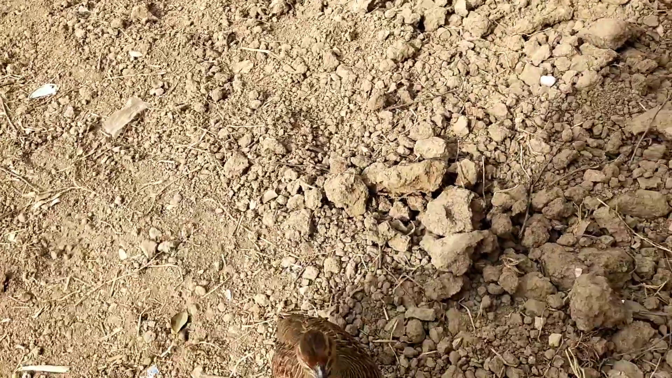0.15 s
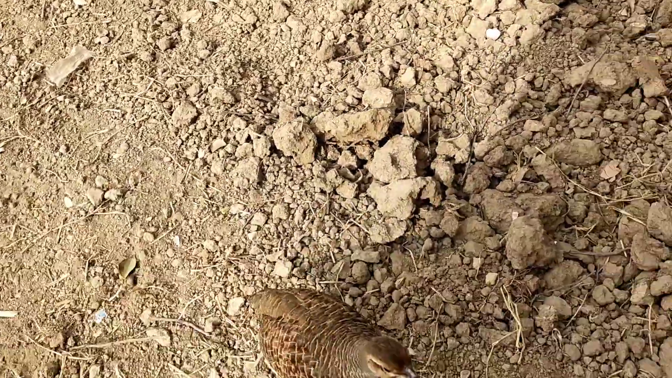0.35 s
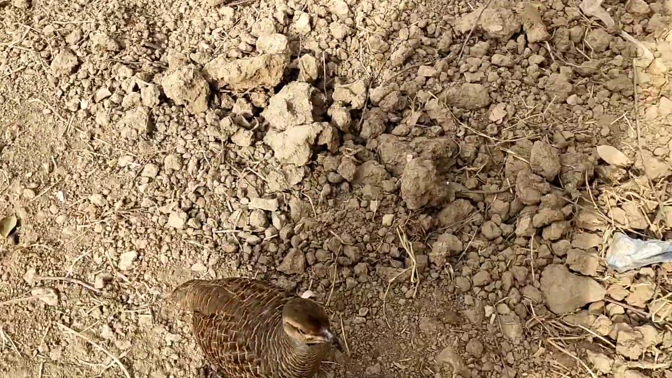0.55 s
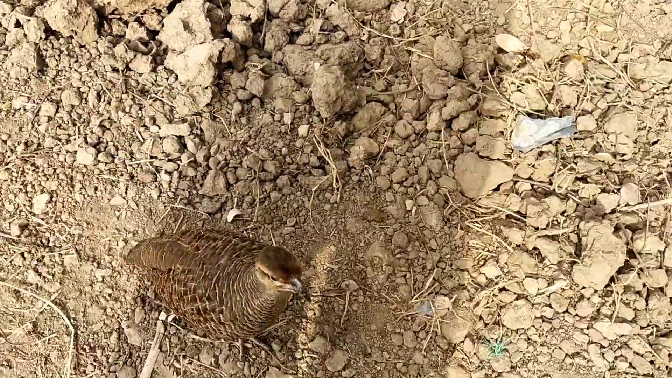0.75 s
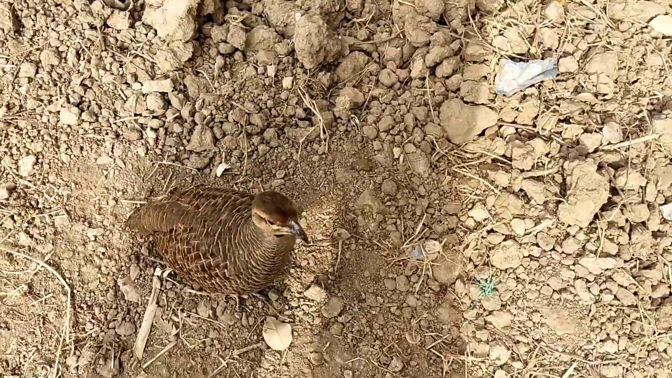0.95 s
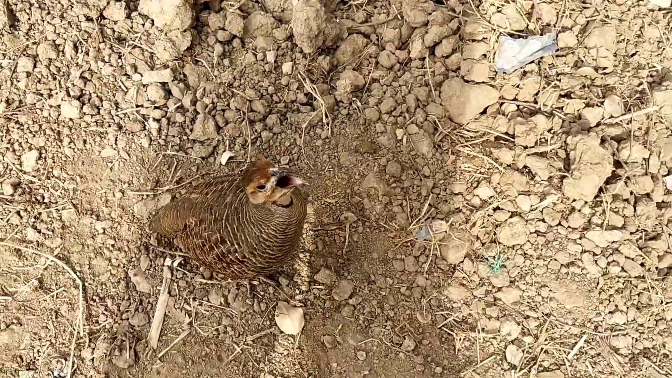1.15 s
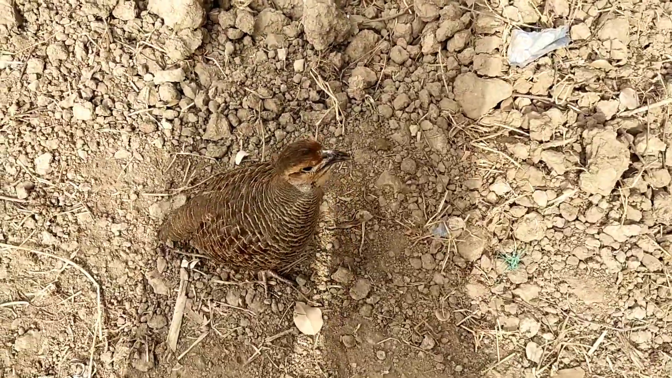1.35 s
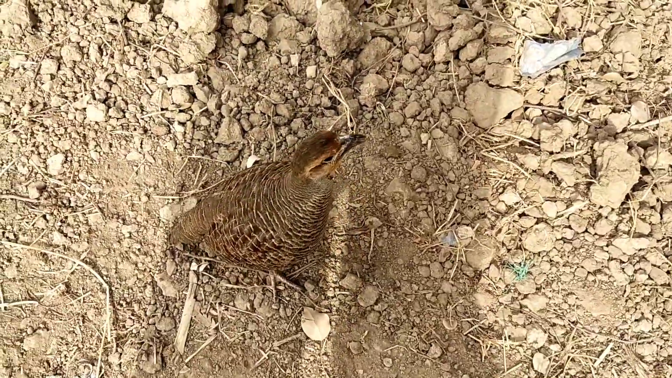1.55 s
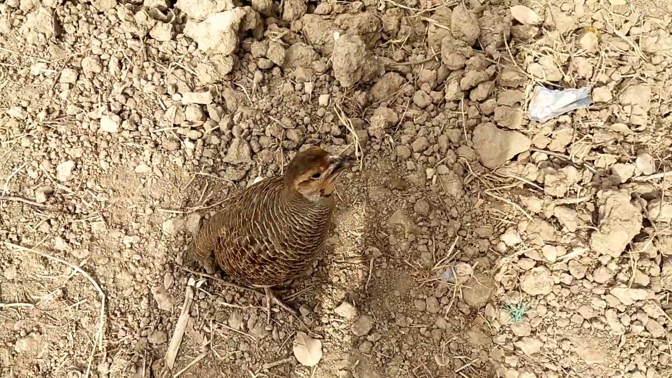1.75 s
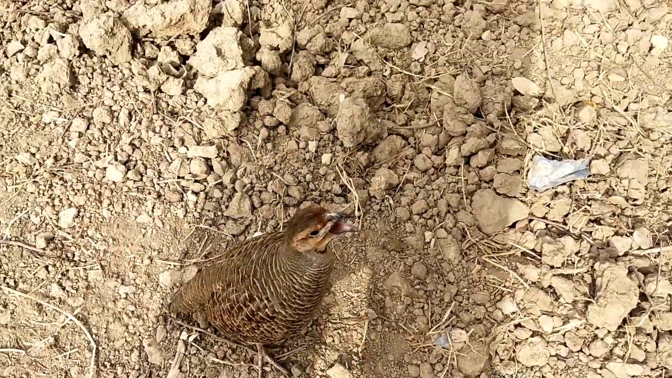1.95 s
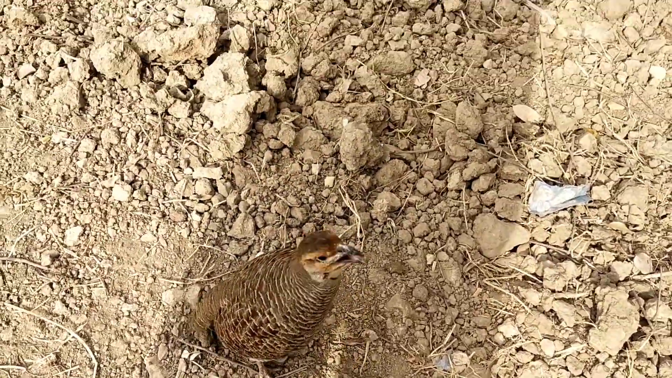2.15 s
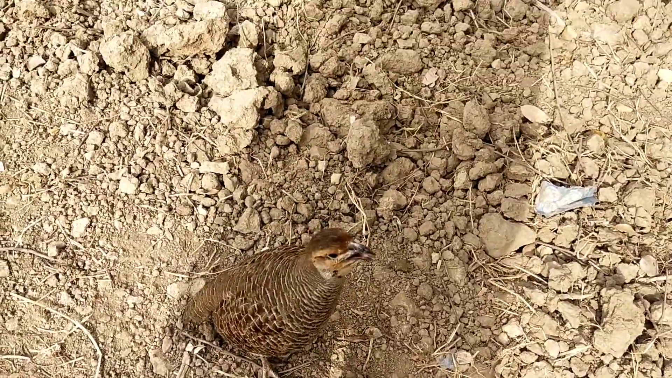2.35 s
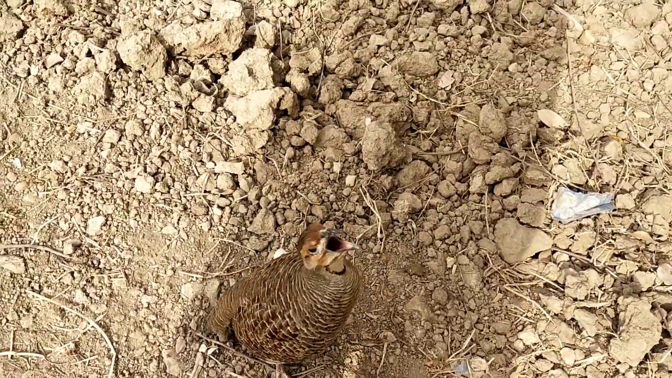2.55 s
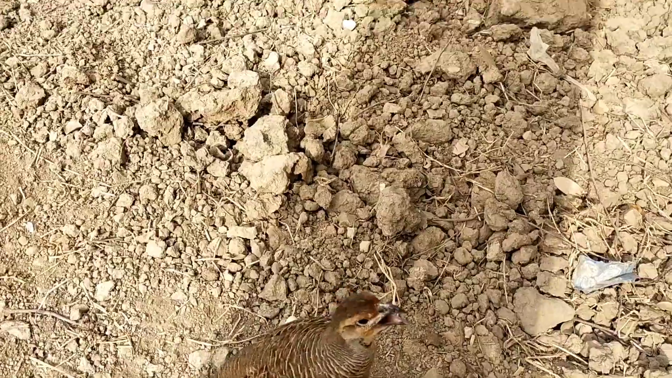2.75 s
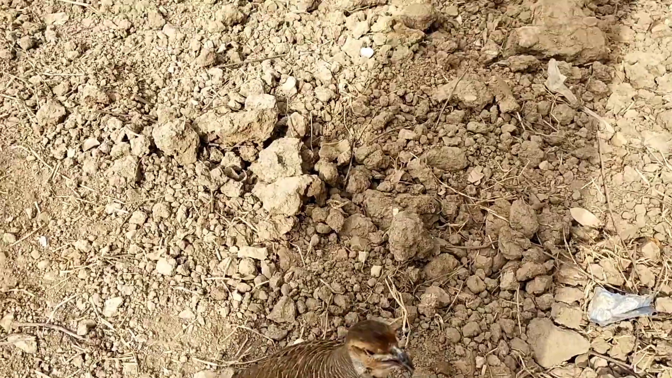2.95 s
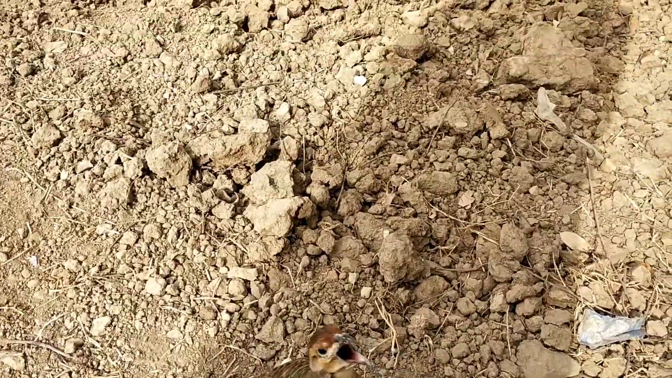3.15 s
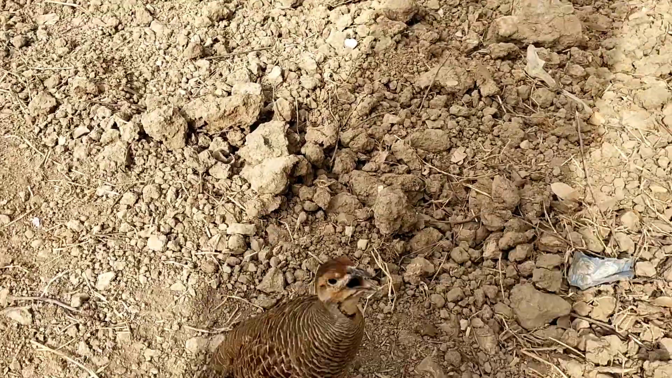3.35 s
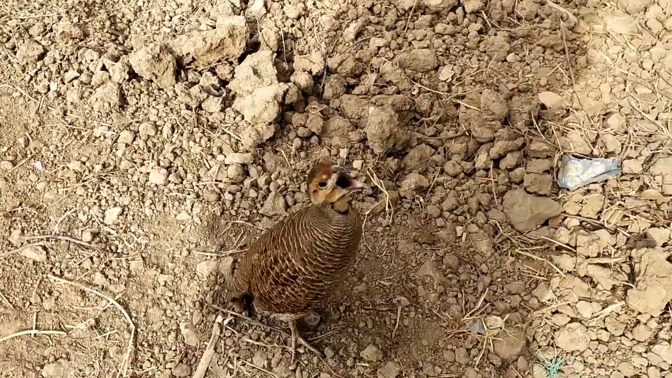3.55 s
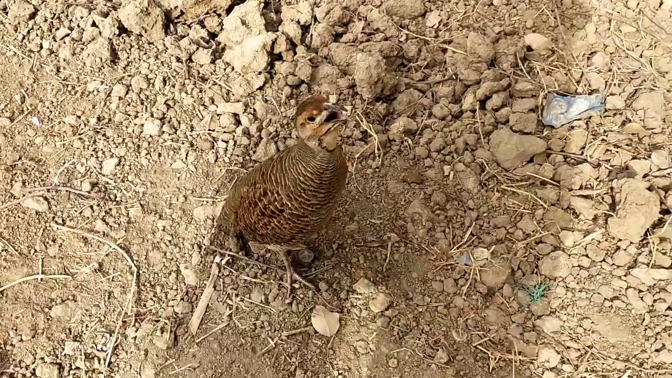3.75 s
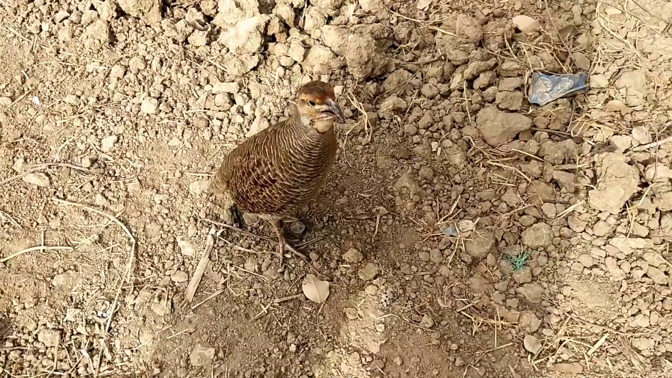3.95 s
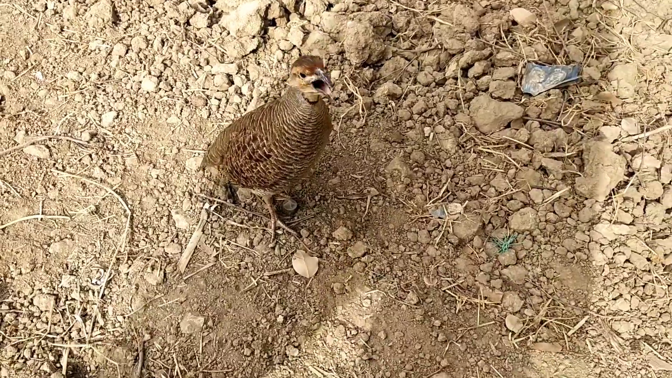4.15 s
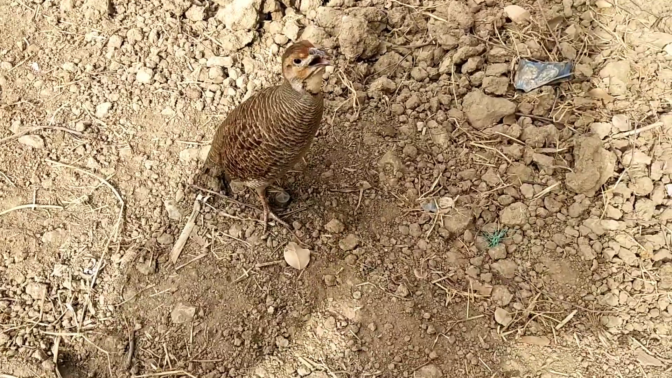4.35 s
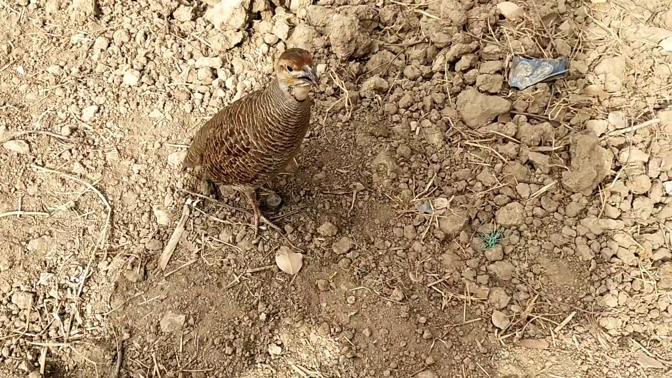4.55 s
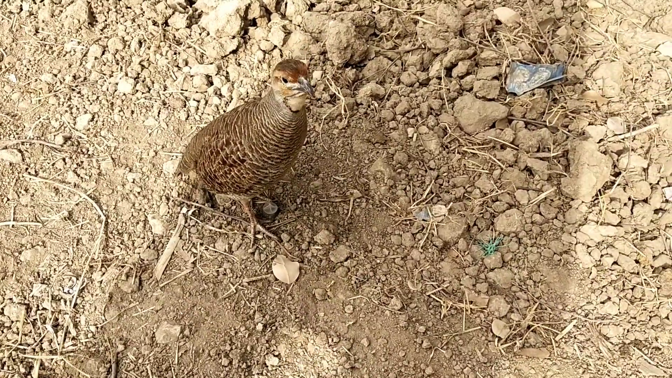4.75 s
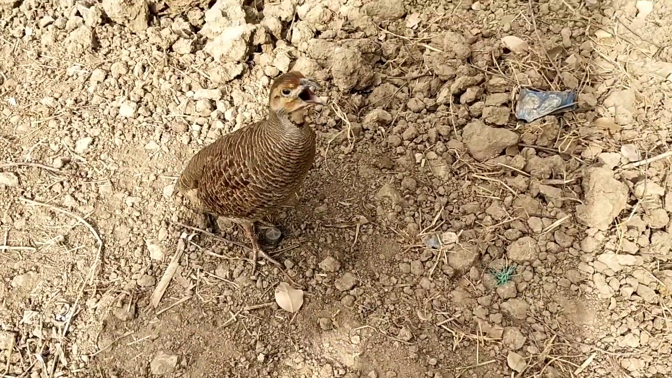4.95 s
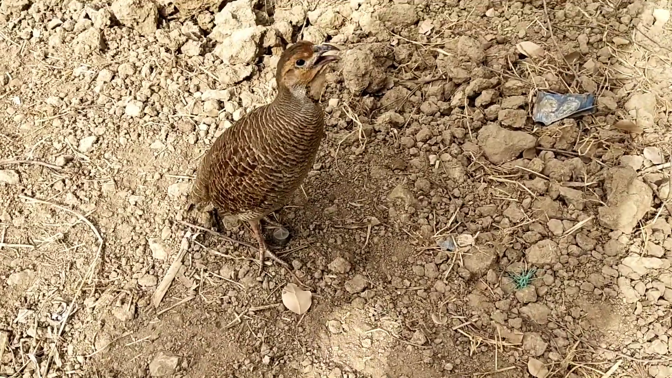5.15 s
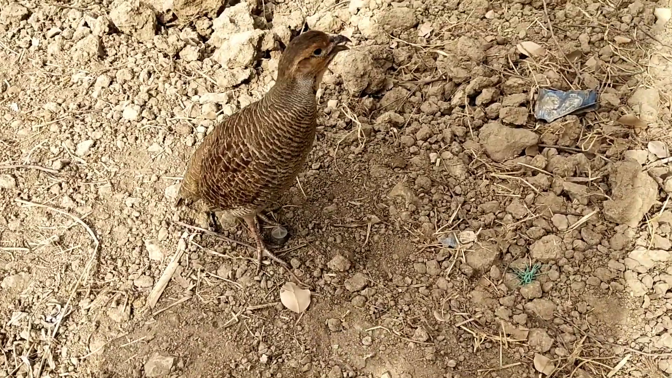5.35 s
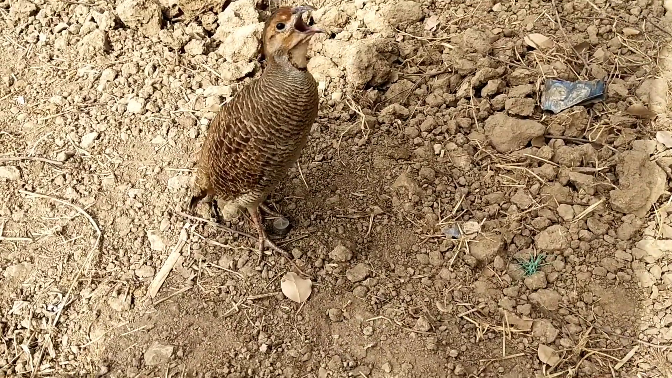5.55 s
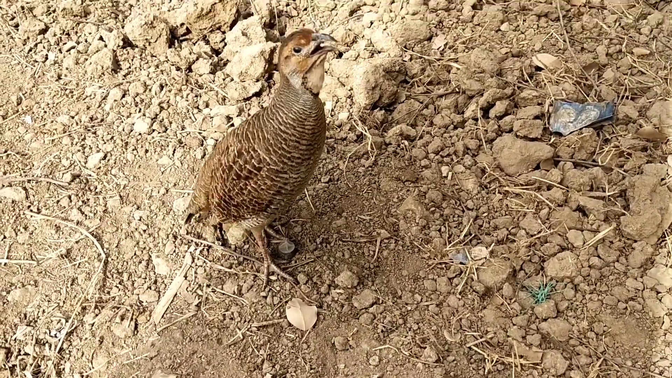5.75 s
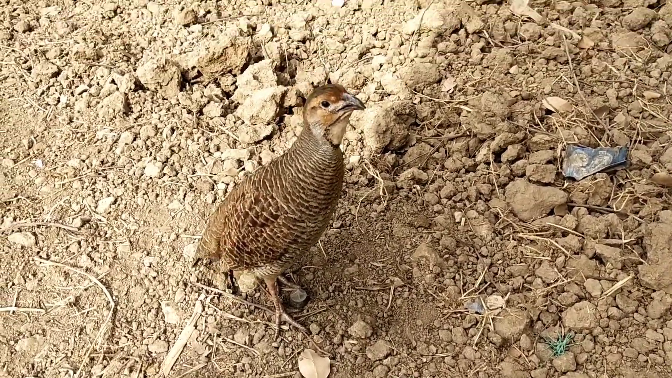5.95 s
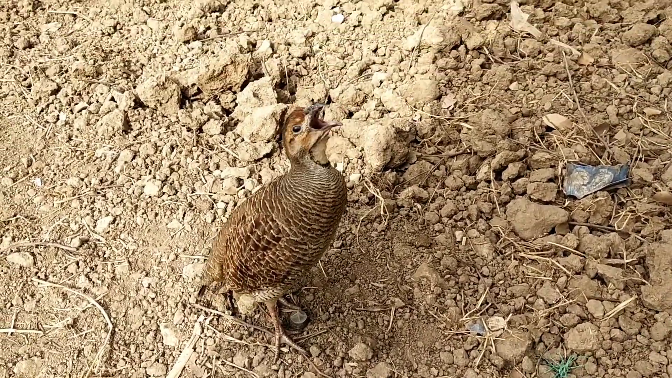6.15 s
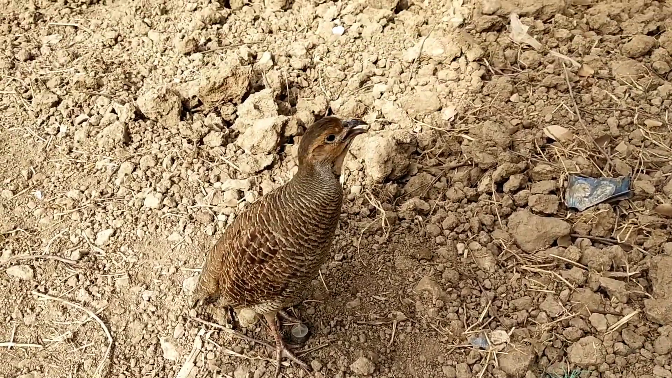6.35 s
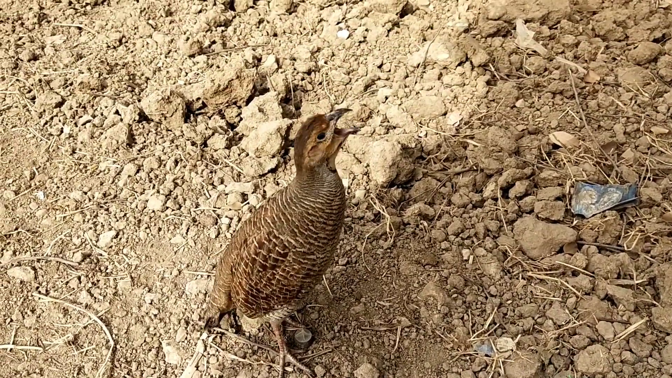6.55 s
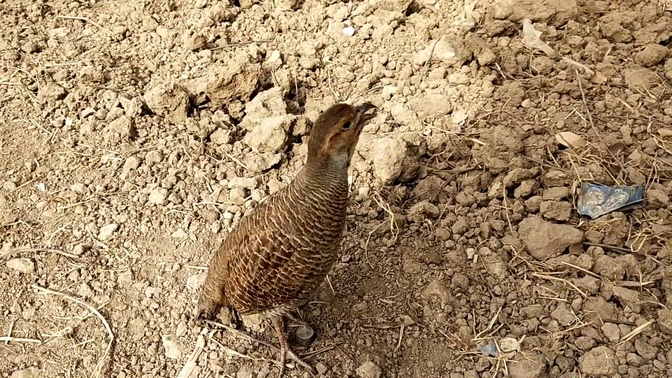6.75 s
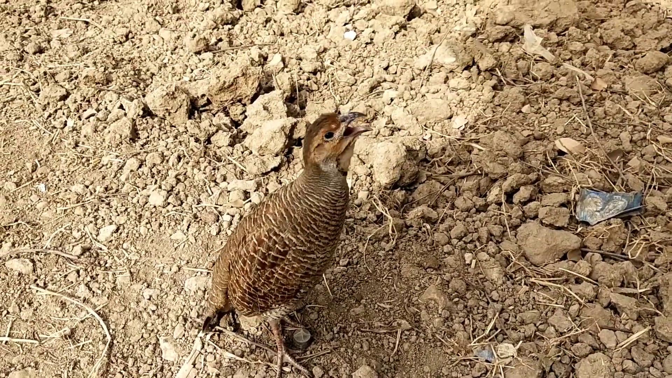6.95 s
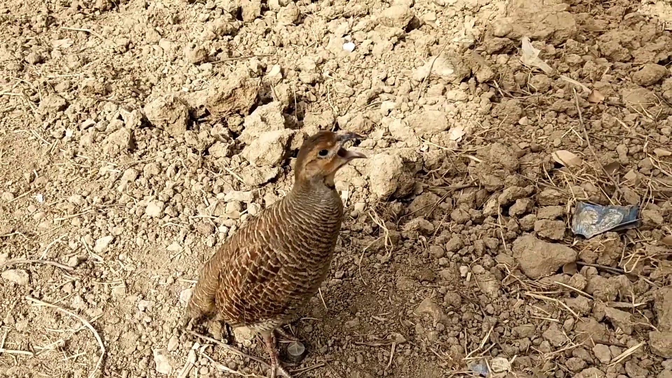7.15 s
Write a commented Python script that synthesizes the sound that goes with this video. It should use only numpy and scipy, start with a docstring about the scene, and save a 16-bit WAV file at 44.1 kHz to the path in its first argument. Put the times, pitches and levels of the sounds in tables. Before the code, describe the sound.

For the first second there is little but low outdoor rumble, a soft handling hiss, very faint far tones and light bumps near 0.2 seconds. A short quiet rasp from a second bird comes at about 0.95, and at 1.1 a francolin right by the camera starts shouting. Its fast, piercing phrases have three parts, a quick arch, a flat note near two kilohertz and a fall, with croaky edges. Between them come lower, hoarse barks, often two or three in a row until about 6, fewer afterwards; some end in a tiny yelp. A dull bump falls near 2.7. The second bird rasps throughout, more noticeably from 3.3 to 6.7, and gives thin falling whistles at 6.3 and 7.0. From 6.2 the phrases come closer together, still loud up to the end around 7.3. Short scattered echoes answer from distant walls; loud notes are compressed.

```python
"""A francolin calls loudly at the feet of a hand-held camera on open ground: a whistle with overtones sings
three-part phrases and lower barked notes, entered and left through croaks, slap pulses that ring a throat.
A second bird answers with rasps, pulse trains through throat and beak, and thin falling whistles.
Far walls echo as bursts of scattered noise; rumble, hiss, far tones and bumps lie beneath.
The swaying camera shifts the lag between its two ports, and its limiter holds the loud notes down."""
import sys
import numpy as np
from scipy import signal
from scipy.fft import rfft, irfft, next_fast_len
from scipy.io import wavfile
from scipy.ndimage import uniform_filter1d, minimum_filter1d, map_coordinates

SR = 44100
rng = np.random.default_rng(int(sys.argv[2]) if len(sys.argv) > 2 else 0)


def wav_record(signal):
    """Record a signal, one row per channel, as 16-bit PCM in the file named by sys.argv[1]."""
    frames = np.transpose(np.atleast_2d(signal))
    bounded = np.clip(frames, -1, 1)
    # unit amplitude maps onto the largest positive 16-bit level
    quanta = np.round(bounded * 32767).astype(np.int16)
    wavfile.write(sys.argv[1], SR, quanta)


N = 321930

# The yelp that may close a note. Each row: share of the yelp's length, pitch as a ratio to the end of the
# note before, level in dB over that note (a phrase adds 7 dB).
YELP = [(0.149, 1.3, -3.5), (.35, 1.27, -8), (.8, .92, -5.5)]
EDGE_S = 0.0033  # attack of a barked whistle; no closing yelp is sung unless it is longer than this


def amp(db):
    """Level in decibels to amplitude ratio."""
    return 10 ** (np.asarray(db) / 20)


def unit(x):
    """Normalization to an rms of 1."""
    return x / np.sqrt(np.mean(x ** 2) + 1e-20)


def along(points, hz):
    """Interpolation of (Hz, value) points on a logarithmic frequency axis."""
    f, v = np.transpose(points)
    return np.interp(np.log(hz + 1), np.log(f + 1), v)


def curves(rows):
    """Piecewise-linear control: one curve over time for each column after the seconds."""
    s, *cols = np.transpose(sorted(rows))
    return [np.interp(np.arange(N) / SR, s, c) for c in cols]


def wobble(rate):
    """Band-limited random modulation: a smooth curve through random knots, rate of them a second."""
    knots = rng.standard_normal(int(N * rate / SR) + 4)
    return map_coordinates(knots, [np.arange(N) * rate / SR])


def filtered(x, response):
    """Linear filtering: the spectrum is multiplied by a complex response of frequency."""
    m = next_fast_len(x.shape[-1] + 8192)
    spectrum = rfft(x, m) * response(np.fft.rfftfreq(m, 1 / SR))
    return irfft(spectrum, m)[..., :x.shape[-1]]


def modes(table):
    """Modal superposition: causal resonances (Hz, width Hz, dB) summed with alternating sign."""
    def response(f):
        return sum((-1) ** k * amp(db) * 1j * f * w / (c * c - f * f + 1j * f * w)
                   for k, (c, w, db) in enumerate(table))
    return response


def francolin():
    """Source and filter: a harmonic whistle, a slap-driven croak that rings the throat, and breath noise."""
    # Throat resonances. Each row: centre in Hz, width in Hz, level in dB. The first is low, the next
    # two are the slack and the taut ring, the others are the upper resonances.
    throat = [(778, 2040, -14), (1404, 297, 5), (1852, 388, 8.5), (2770, 1080, -2), (4170, 1680, -7),
              (5533, 314, -3), (12650, 2500, -22.5)]
    # Whistle partials above the third. Each row: partial number, level in dB before half of
    # the 2nd partial's dB is added.
    overtones = [(4, -25.5), (5, -33.5), (6, -27), (7, -26.5)]
    # Colour of the breath. Each row: frequency in Hz, relative level in dB.
    breath_colour = [(300, -6), (900, -45), (2000, -11.5), (4000, 9), (6300, 7.5), (7500, -48.5),
                     (13000, -23.5), (16000, -42)]
    dulling = 0.17  # dB lost by the upper throat and the breath for each dB the 2nd partial falls

    hz, db, croak_hz, croak_db, h2, h3, rough, croak_rough, limp = song()
    phase = 2 * np.pi * np.cumsum(hz * (1 + 0.03946 * rough * wobble(300))) / SR
    tone = np.cos(phase)
    tone = tone + amp(h2 + wobble(190)) * np.cos(2 * phase + .5)
    tone = tone + amp(h3 + 2.7 * wobble(180)) * np.cos(3 * phase + 1.9)
    # turbulence blurs the top partials
    fuzz = sum(amp(level + .5 * h2) * (.6 - rough + wobble(900)) * np.cos(k * phase) for k, level in overtones)
    whistle_db = db + .5 * wobble(60) + rough * (6 * wobble(330) - 14 * rough)
    whistle = np.sqrt(2) * amp(whistle_db) * (tone + fuzz)

    slaps = pulses(croak_hz * (1 + .04 * wobble(170)), croak_rough, limp)  # the croak's pitch stumbles
    slack, taut = (filtered(slaps, modes([throat[0], ring])) for ring in throat[1:3])
    stretch = np.clip(croak_hz / 400 - 1.6, 0, 1)  # the throat's ring rises with the croak
    low = slack + stretch * (taut - slack)
    high = stretch * filtered(slaps, modes(throat[3:]))
    croak = amp(croak_db) * (low + amp(7.0 + dulling * h2) * high) / np.std(low)

    air = unit(filtered(rng.standard_normal(N), lambda f: amp(along(breath_colour, f))))
    # breath follows the louder of croak and lowered whistle
    breath = amp(np.maximum(db - 13.0, croak_db) - 13 + dulling * h2 + 4 * wobble(250)) * air
    return filtered(whistle + croak + breath, lambda f: 1 / (1 + (330 / (f + 1)) ** 6))


def song():
    """Motor control of the syrinx: pitch Hz, whistle dB, croak Hz, croak dB, 2nd and 3rd partial dB,
    roughness of whistle and croak, limp."""
    # Three-part phrases: arch, flat note, fall. Each row: flat note's start in seconds, beat from there to the
    # fall in seconds, fall length in seconds, closing yelp length in seconds, arch, flat and fall-end pitch
    # in Hz, arch, flat and fall level in dB, 2nd and 3rd partial in dB.
    phrases = [(1.129, 0.061, 0.038, 0.0003, 1767, 2001, 1579, -18.5, -8.5, -9.5, -11.5, -13.5),
               (1.662, 0.061, 0.026, 0.014, 1955, 2048, 1823, -4.5, -14, -11.5, -14.5, -13),
               (2.033, 0.062, .045, 0.0029, 2115, 2082, 1627, -14.5, -7.5, -10, -11.5, -15.5),
               (2.552, 0.066, 0.046, 0.0019, 2058, 2071, 1660, -15.5, -9, -8.5, -9.5, -14),
               (3.164, 0.066, 0.048, 0, 1982, 2081, 1631, -14, -9.5, -10, -10.5, -12),
               (3.534, 0.065, 0.041, 0, 2067, 2122, 1590, -13.5, -9, -12, -3, -13),
               (4.233, 0.064, 0.041, 0, 2008, 2076, 1571, -13, -8.5, -9.5, -10.5, -18),
               (5.011, 0.07, 0.045, 0.00071, 1970, 2067, 1600, -17, -11.5, -8.5, -8.5, -9),
               (5.483, .066, .051, 0.0028, 2003, 2111, 1569, -8, -14, -10.5, -10.5, -6),
               (6.164, 0.067, 0.048, 0.0019, 1981, 2075, 1570, -19.5, -9.5, -11, -10.5, -17),
               (6.507, 0.061, 0.045, 0, 2042, 2121, 1536, -22.5, -11, -12, -7.5, -10.5),
               (6.869, 0.068, 0.045, 0.0031, 2012, 2114, 1550, -19, -9.5, -10, -8, -10.5),
               (7.213, 0.068, 0.058, 0.00099, 2054, 2121, 1624, -21.5, -10.5, -10.5, -8.5, -12.5)]
    # Low notes. Each row: start, croak length, whistle length and closing yelp length in seconds, pitch and
    # end pitch in Hz, croak, whistle and 2nd partial level in dB, roughness from 0 to 1.
    barks = [(1.323, 0.037, 0.028, 0.00074, 1496, 1314, -9, -8, -28.5, 0.35),
             (1.449, 0.027, 0.035, 0.003, 1438, 1346, -6.5, -9.5, -39, 0.33),
             (1.858, 0.029, 0.033, 0.00098, 1741, 1500, -6, -10, -21, 0.15),
             (2.228, 0.03, 0.039, 0.0047, 1750, 1461, -8.5, -11, -18, 0.19),
             (2.36, 0.027, 0.021, 0.021, 1600, 1583, -8.5, -8.5, -18, 0.11),
             (2.756, 0.03, 0.036, 0.0052, 1782, 1447, -7, -9.5, -18, 0.03),
             (2.887, 0.028, 0.018, 0.021, 1649, 1589, -8, -7.5, -25.5, 0.15),
             (3.022, 0.018, 0.023, 0.004, 1494, 1369, -6, -5, -77, 0.75),
             (3.376, 0.021, 0.038, 0, 1832, 1765, -7.5, -13.5, -12, 0.11),
             (3.725, 0.03, 0.041, 0.0037, 1717, 1390, -10.5, -12, -19.5, 0.17),
             (3.862, 0.023, 0.023, 0.013, 1563, 1558, -9, -9, -23.5, 0.24),
             (3.998, 0.016, 0.041, 0, 1394, 1332, -11.5, -8.5, -49.5, 0.43),
             (4.423, 0.028, 0.037, 0.0036, 1724, 1361, -12, -11.5, -22.5, 0.17),
             (4.554, 0.015, 0.04, 0.0035, 1539, 1428, -12.5, -8.5, -39, 0.23),
             (4.689, 0.01, 0.029, 0.0063, 1435, 1335, -8, -14.5, -55.5, 0.61),
             (5.215, 0.03, 0.033, 0.0041, 1652, 1425, -11, -10, -24.5, 0.2),
             (5.345, 0.02, 0.021, 0, 1543, 1442, -7.5, -5.5, -57, 0.28),
             (5.693, 0.02, 0.044, 0.0026, 1788, 1409, -8, -8.5, -17.5, 0.06),
             (5.821, 0.02, 0.033, 0.0054, 1583, 1401, -9, -6.5, -23.5, 0.39),
             (5.948, 0.013, 0.04, 0.0031, 1498, 1387, -19.5, -11, -48, 0.75),
             (6.365, 0.023, 0.019, 0.0013, 1916, 1836, -12.5, -7.5, -10.5, 0.09),
             (6.691, 0.021, 0.037, 0.0013, 1617, 1429, -9, -6.5, -32, 0.28),
             (7.059, 0.027, 0.023, 0.0021, 1712, 1579, -12, -7.5, -19, 0.08)]
    rows = sum([phrase(*row) for row in phrases] + [bark(*row) for row in barks], [])
    return uniform_filter1d(curves(rows), size=44)  # muscles need a millisecond


def phrase(s, beat, fall, yelp, arch_hz, hz, end_hz, arch_db, flat_db, fall_db, h2, h3):
    """Gesture control: five marks, each with its shape; an open beak lifts the overtones."""
    # How each part opens or closes. Each row: seconds from the mark, pitch ratio, whistle level in dB,
    # croak pitch in Hz, croak level in dB, beak opening in dB.
    arch = [(-.0105, 0.93, -94, 706.7, -80, -14), (-.009, 1, -91, 749.3, -4, -19.5),
            (-.0065, .9, -39, 900.6, -10.5, 12), (-.002, .93, -27, 1082, -1, 13.5),
            (.002, 0.98, 10, 1033, -6, 5), (.007, 1, 5.5, 1050, -27, 7), (.014, .86, -2.5, 1047, -14, 11),
            (.02, .74, -14, 1117, 0, 14.5)]
    flat_in = [(-.004, .95, -24.5, 1101, -13.5, 0.0073), (-.001, 1.005, 1.5, 1111, -39, 0.025),
               (.003, 1.015, -1.5, 1056, -45.5, 0.0073)]
    flat_out = [(-.005, 0.99, -1, 1048, -31, 0.5), (-.001, 1, 11.5, 998.5, -1, 6),
                (.005, .55, -10.5, 950, -20, 11), (.013, .45, -47, 849.3, -24.5, 37)]
    fall_in = [(-.01, .45, -30, 799.8, -25.5, 0.74), (-.003, .6, -24.5, 995, -16, 0.76),
               (.001, .99, -3, 1050, -11.5, 1), (.01, 1, 0, 1047, -41, 0.68)]
    fall_out = [(-.012, 1.09, 2.5, 839.2, -36, -10), (0, 1, -2.5, 747.5, -26.5, -13),
                (.007, .9, -61.5, 601.9, -19, -30), (.014, .9, -95, 500, -43.5, -13),
                (.02, .9, -51, 499.3, -72.5, -4)]
    close = fall_out
    if yelp > EDGE_S:
        cry = [(u * yelp, ratio, g + 7, 750, -14, 0) for u, ratio, g in YELP]
        close = fall_out[:2] + cry + [(yelp + dt, *r) for dt, *r in fall_out[2:]]
    marks = [(s - .03, arch_hz, arch_db, arch),  # the arch leads by 0.03 s
             (s, hz, flat_db, flat_in),
             (s + .51 * beat, hz, flat_db, flat_out),  # the flat note fills this share of the beat
             (s + beat, 2113, fall_db, fall_in),  # one reference pitch in Hz opens every fall
             (s + beat + fall, end_hz, fall_db, close)]
    rows = []
    for at, pitch, db, shape in marks:
        for dt, ratio, tone_db, croak_hz, croak_db, beak_db in shape:
            rough = .05 if tone_db > -9 else .5  # the whistle breaks up as it slides in or out
            rows.append((at + dt, ratio * pitch, db + tone_db, croak_hz, db + croak_db,
                         h2 + max(beak_db, 1.27 * beak_db), h3 + 1.26 * beak_db, rough, .22, .3))
    return rows


def bark(s, croak, hold, yelp, f0, f1, croak_db, db, h2, rough):
    """Register transition: rising croak, sagging whistle, perhaps a yelp, closing croak."""
    # The opening croak. Each row: share of its length, pitch in Hz, level in dB over the note's croak level.
    croak_rise = [(0, 478.5, -13.5), (.3, 701.4, -3.5), (.65, 900, -8), (.9, 1003, -8.5)]
    silent = -90  # dB
    below, limp = 2 / 3, .5  # croak pitch ratio under the whistle; how much weaker every second slap is there
    b, b1 = s + croak, s + croak + hold
    under = db - 10.0 - 30 * np.exp(-6 * rough)  # a rough note never leaves the croak
    close, end = db - 15, b1 + yelp + 0.0077  # closing croak: dB under the whistle, seconds after it
    shape = [(s - EDGE_S, f0, silent, 450, silent, 0)]
    shape += [(s + u * croak, u * f0, db - 90 * (1.04 - u), hz, croak_db + g, u * u * limp)
              for u, hz, g in croak_rise]
    shape += [(b + EDGE_S, f0, db, below * f0, under, limp),
              ((b + b1) / 2, .62 * f0 + .38 * f1, db + 4.0, 0.75 * f0, under, limp),
              (b1 - EDGE_S, f1, db, below * f1, under, limp),
              (b1 + EDGE_S / 2, 0.84 * f1, db - 19.0, .5 * f1, close, 0)]
    if yelp > EDGE_S:
        shape += [(b1 + EDGE_S / 2 + u * yelp, ratio * f1, db + g, .5 * f1, close + 4, 0)
                  for u, ratio, g in YELP]
    shape += [(end, f1, -60, 0.31 * f1, -45, 0), (end + EDGE_S, 0.76 * f1, silent, 450, silent, 0)]
    croak_rough = .09 + .3 * rough
    # the 3rd partial fades through the whistle
    return [row[:-1] + (h2, h2 - 1.5 - 170 * max(row[0] - b, 0), rough, croak_rough, row[-1]) for row in shape]


def pulses(hz, rough, limp=0):
    """Pulsed phonation: syrinx slaps of rms near 1 scatter in timing and size with roughness, every second one
    may limp, and air hisses once a cycle."""
    n = len(hz)
    cycles = np.cumsum(hz) / SR
    scatter = rng.standard_normal((int(cycles[-1]) + 2, 2))[cycles.astype(int)]
    turn = cycles % 1 - .5 - np.clip(.2 * rough * scatter[:, 0], -.4, .4)
    slap = np.sinc(turn * SR / hz * .8) * np.sqrt(SR / hz) * amp(4 * rough * scatter[:, 1])
    slap = slap * (1 + limp * (-1) ** cycles.astype(int))
    return slap + .5 * rough * np.exp(-(turn / .2) ** 2) * rng.standard_normal(n)


def second_bird():
    """Source and filter: pulsed rasps through throat and beak; two-partial whistles that fall exponentially."""
    # Rasps. Each row: start and nominal end in seconds, pulse rate and end pulse rate in Hz, throat
    # resonance in Hz, level in dB, beak brightness in dB, roughness from 0 to about 1.
    rasps = [(0.947, 0.995, 520, 409, 1480, -28, -4, 0.2), (1.827, 1.936, 426.3, 430.6, 1150, -33, -4, 0.4),
             (2.955, 3.017, 405, 359, 1198, -36.5, -10, 0.6),
             (3.342, 3.388, 378, 413, 2060, -25.5, -6.5, 0.5),
             (4.069, 4.123, 421.6, 413, 2340, -24.5, -12.5, 0.6),
             (4.674, 4.738, 319, 374, 2010, -31.5, -13.5, 0.3),
             (4.846, 4.989, 306.2, 460, 2206, -26.5, -13, 0.8),
             (5.307, 5.388, 275.2, 476.4, 2032, -27, -6, 0.8),
             (6.009, 6.06, 409.3, 391, 1778, -22, -11.5, 0.6),
             (6.262, 6.358, 402, 426, 1890, -36.5, -9, 1.1),
             (6.645, 6.738, 371.4, 461, 1862, -31.5, -7.5, 0.7)]
    # Whistles. Each row: start and end in seconds, start pitch and pitch approached in Hz, level and end
    # level in dB, 2nd partial in dB.
    pipes = [(6.336, 6.46, 3060, 2860, -25, -47, -7), (7.034, 7.164, 3060, 2830, -24, -45, -11)]
    # Upper resonances. Each row: centre in Hz, width in Hz, level in dB before the beak brightness is added.
    beak = [(5320, 1090, 9), (6200, 2070, 3), (8300, 20000, -13.5)]
    # Hollow between throat and beak: centre in Hz, width in Hz, depth as dB under total.
    dip = (3400, 1300, -1.2)
    out, flutter_db = np.zeros(N + SR), 2.5 * wobble(200)
    for s, end, hz0, hz1, throat_hz, db, beak_db, rough in rasps:
        u = np.linspace(0, 1, round((end - s + 0.0221) * SR))
        tract = modes([(600, 500, -17), (throat_hz, 200, 8)] + [(c, w, g + beak_db) for c, w, g in beak])
        swell = np.clip(u / 0.14, .2, 1) * np.clip((.9 - u) / 0.58, 0, 1) ** 1.38
        slaps = pulses(hz0 + (hz1 - hz0) * np.clip(3 * u, 0, 1), rough)
        train = (slaps + 1.3 * rough * rng.standard_normal(len(u))) * swell
        rasp = filtered(train, lambda f: tract(f) * (1 - modes([dip])(f)) / (1 + (f / 10800) ** 10))
        out[round(s * SR):][:len(u)] += amp(db) * unit(rasp)
    for s, end, hz0, hz1, db0, db1, h2 in pipes:
        u = np.linspace(0, 1, round((end - s) * SR))
        phase = 2 * np.pi * np.cumsum(hz1 + (hz0 - hz1) * np.exp(-3 * u)) / SR
        edge = np.clip(np.minimum(u / 0.05, (1 - u) / 0.03), 0, 1)
        level_db = db0 + (db1 - db0) * u * np.sqrt(u) + flutter_db[round(s * SR):][:len(u)]
        tone = np.cos(phase) + amp(h2) * np.cos(2 * phase)
        out[round(s * SR):][:len(u)] += amp(level_db) * edge * tone
    return out[:N]


def heard(x, lag_ms, pan_db):
    """Interaural-style cues: the sound reaches the two ports at different moments and strengths."""
    # The camera body bends the sound. Each row: frequency in Hz, further left lag in radians.
    ports = [(860, -0.35), (1640, 0.45), (2330, -0.046), (3880, -0.31), (6100, -0.63)]
    side = np.array([[1], [-1]]) / 2
    at = np.arange(N) - side * lag_ms * SR / 1000
    both = amp(side * pan_db) * map_coordinates(x, [at], order=3)
    return filtered(both, lambda f: np.exp(-1j * side * along(ports, f)))


def yard(x):
    """Convolution reverberation: noise shaped into scattered answers of far walls and a diffuse tail."""
    # Wall answers. Each row: delay in seconds, level in dB before decay.
    echoes = [(0.055, -23.5), (0.099, -12), (0.131, -6)]
    # Scatter off the clods: delay in seconds, level in dB before decay.
    ground = (.003, -15)
    # Decay. Each row: frequency in Hz, time in seconds to fall by 60 dB.
    decay = [(500, 0.013), (2000, 0.26), (6000, 0.19), (12000, 0.33)]
    grain = np.array([[.9, 1], [.9, -0.87]]) @ rng.standard_normal((2, SR // 2))
    hz, t, z = signal.stft(grain, SR, nperseg=256)
    walls = sum(amp(db) * np.exp(-((t - s) / .005) ** 2) for s, db in echoes + [ground])
    diffuse = amp(-29) * (t > .015)
    shape = (walls + diffuse) * amp(-60 * t / along(decay, hz)[:, None])
    tail = signal.istft(z * shape, SR, nperseg=256)[1] / 20
    return signal.fftconvolve(x[None], tail, axes=1)[:, :N]


def outdoors():
    """Superposed background: lumpy rumble, hiss, faint far tones, and bumps as damped pulses."""
    # Low rumble in gusts. Each row: time in seconds, level in dB.
    gusts = [(0, -54.5), (.3, -54.5), (.47, -66), (1.2, -65.5), (2.5, -61), (3.03, -59), (3.25, -69),
             (3.9, -58), (4.2, -52), (4.35, -65), (4.9, -51), (5.1, -68), (5.4, -55.5), (5.6, -59.5),
             (6.06, -53), (6.25, -63.5), (7.3, -59.5)]
    # Handling and outdoor hiss. Each row: time in seconds, level in dB.
    rustle = [(0, -58), (.12, -54.5), (.26, -54.5), (.45, -69.5), (.6, -64), (.8, -69), (.94, -62),
              (1.3, -59.5)]
    # Noise colours. Each row: frequency in Hz, relative density in dB per Hz.
    rumble = [(25, -38), (62, -10), (81, -7.5), (130, -6.5), (172, -12), (400, -17), (520, -52.5),]
    hiss = [(180, -55), (300, -28.5), (620, -17), (877, -14.5), (7620, -32.5), (11700, -56), (15500, -34.5)]
    # Faint far tones. Each row: start and end in seconds, pitch in Hz, level in dB.
    hums = [(0.025, .3, 827, -53.5), (0.04, 0.315, 1654, -59), (0.22, 0.434, 1800, -61.5),
            (0.626, 0.88, 832, -66)]
    # Bumps on the camera. Each row: time in seconds, level in dB, rate in Hz.
    thumps = [(.158, -26.5, 500), (0.249, -33, 246), (2.672, -16.5, 325.5)]
    t = np.arange(N) / SR
    out = amp(curves(gusts)[0] + 4 * wobble(8)) * noise(rumble, alike=.55)
    out += amp(curves(rustle)[0] + 3.4 * wobble(28.0)) * noise(hiss, alike=0.16)
    for s, end, hz, db in hums:
        fade = np.clip(np.minimum((t - s) / 0.043, (end - t) / 0.085), 0, 1)
        out += amp(db + 3.4 * wobble(28.7)) * fade * np.sin(2 * np.pi * hz * t)
    for s, db, hz in thumps:
        u = np.clip(t - s, 0, 1) * 2 * np.pi * hz
        out += amp(db) * np.e * u * (1 - u / 2.2) * np.exp(-u)
    return out


def noise(spectrum, alike):
    """Partial coherence: shaped stereo noise of rms 1 with the given correlation between the sides."""
    mid, side = filtered(rng.standard_normal((2, N)), lambda f: amp(along(spectrum, f)))
    turn = np.arccos(np.clip(alike, 0, 1)) / 2
    return unit(np.cos(turn) * mid + np.array([[1], [-1]]) * np.sin(turn) * side)


def scene():
    """Superposition of both birds at the ports, their echoes and the background."""
    # The bird seen from the microphone pair. Each row: time in seconds, left lag in milliseconds.
    sway = [(1.1, 0.15), (1.9, 0.093), (2.1, 0.035), (2.65, 0.07), (3.1, 0.067), (3.45, 0.12), (4.1, 0.12),
            (4.6, 0.15), (5.1, 0.097), (5.8, 0.12), (6.3, 0.053), (7.3, 0.039)]
    # Stereo balance. Each row: time in seconds, left level over right in dB.
    lean = [(1.2, 2), (2.25, .3), (3, 1.4), (5.7, .8), (6.2, -.4)]
    # The beak turns to the camera. Each row: time in seconds, gain of the top treble in dB.
    facing = [(1, -6), (5.9, -14.5), (6.3, 8), (7.3, -3.5)]
    (lag_ms,), (pan_db,) = curves(sway), curves(lean)
    near, other = francolin(), second_bird()
    top = filtered(near, lambda hz: 1 / (1 + (8500 / (hz + 1)) ** 8))
    near = near + (amp(curves(facing)[0]) - 1) * top
    return heard(near, lag_ms, pan_db) + heard(other, lag_ms, -9.5) + yard(near + other) + outdoors()


def record(dry):
    """Dynamic compression: a quick limiter turns everything down under loud notes and catches the peaks; the
    band is limited at both ends."""
    level = np.sqrt(np.abs(uniform_filter1d(np.mean(dry ** 2, axis=0), size=128)))
    need = np.minimum(1, amp(-11.0) / (level + 1e-9)) ** 0.19
    held = dry * uniform_filter1d(minimum_filter1d(need, size=400, origin=120), size=200)
    room = np.minimum(1, .88 / (np.abs(held).max(axis=0) + 1e-9))  # gain that keeps each peak within 0.88
    rounded = held * uniform_filter1d(minimum_filter1d(room, size=129), size=129)
    return filtered(rounded, lambda hz: (hz < 15700) / (1 + (55 / (hz + 1)) ** 4))


dry = scene()
out = record(dry)
wav_record(out)
```